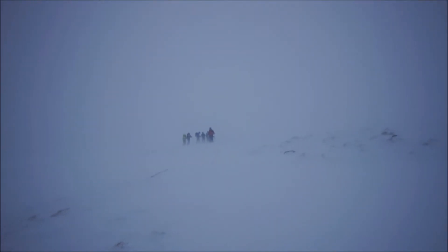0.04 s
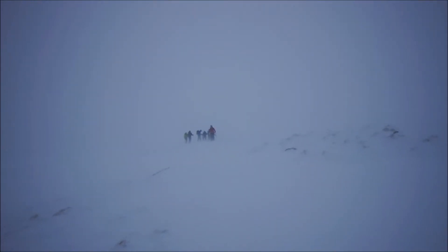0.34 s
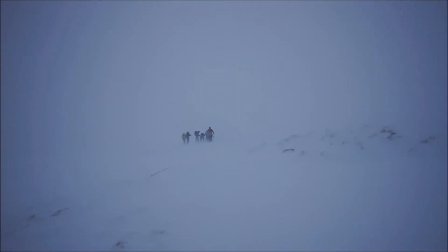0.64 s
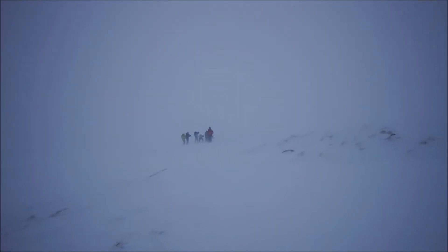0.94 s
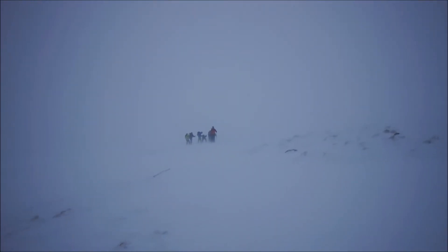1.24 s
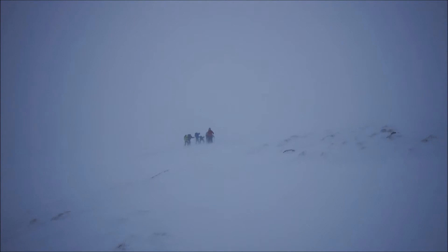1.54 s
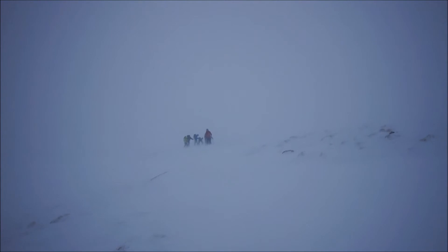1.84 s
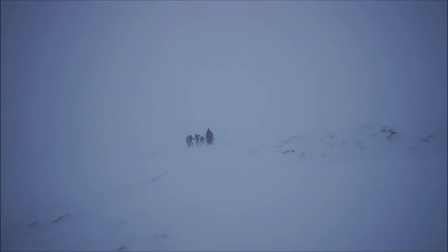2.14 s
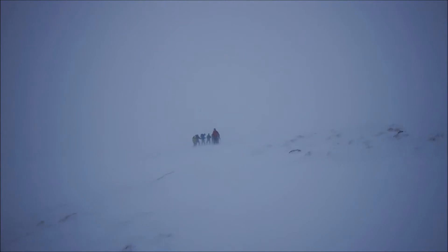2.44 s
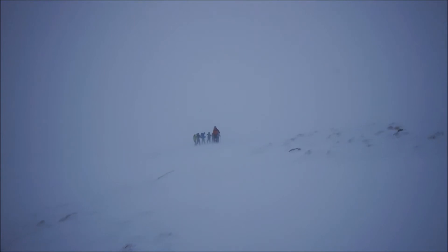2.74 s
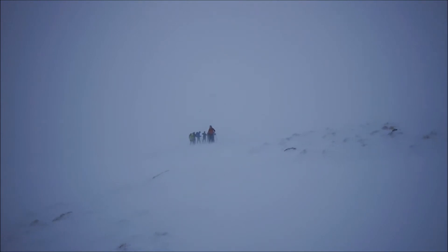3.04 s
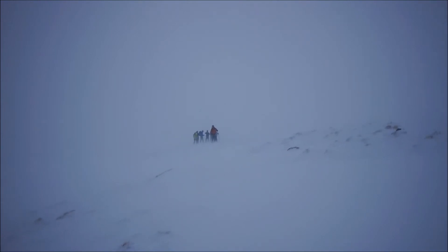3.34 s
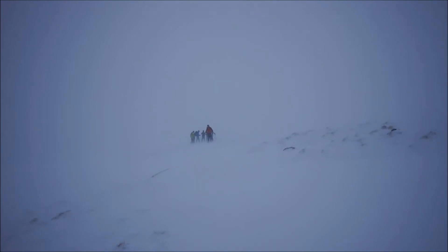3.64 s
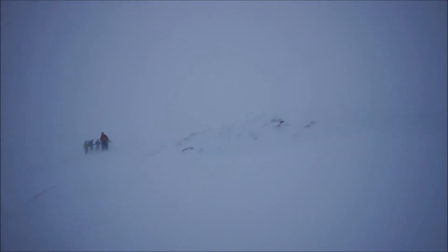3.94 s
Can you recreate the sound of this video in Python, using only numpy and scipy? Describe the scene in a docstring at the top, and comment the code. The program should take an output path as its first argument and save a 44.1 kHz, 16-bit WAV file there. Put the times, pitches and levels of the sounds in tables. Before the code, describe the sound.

Strong gusty wind buffets the microphone with a thumping roar and fluttering hiss.

```python
"""Storm wind blows straight onto a camera's two microphone ports on an open snowy hillside.
Its eddies exert a fluctuating pressure, heard as a thumping low roar that brightens as the wind pushes
harder, gathers now and then into a gliding hoot and breaks off in short lulls. The same flow, tearing
past the housing, adds a fluttering hiss, one bright whoosh and the fine patter of blown snow."""
import sys
import numpy as np
from scipy import signal
from scipy.fft import rfft, irfft
from scipy.io import wavfile
from scipy.ndimage import uniform_filter1d

SR = 44100
rng = np.random.default_rng(int(sys.argv[2]) if len(sys.argv) > 2 else 0)


def log_audio(samples):
    """Write samples as a 16-bit WAV file to the path given in sys.argv[1]."""
    # one column per channel
    frames = np.atleast_2d(samples).T
    # limit to full scale, then quantise
    limited = np.clip(frames, -1, 1)
    pcm = np.round(limited * 32767).astype(np.int16)
    wavfile.write(sys.argv[1], SR, pcm)


N = 176400
TIME_S = np.arange(N) / SR
FREQS = np.maximum(np.arange(N // 2 + 1) * SR / N, 1)
BAND_HZ = 22 * 2 ** np.arange(0, 10.1, .5)

# Push of the wind on the ports: time_s, level_db
WIND_PUSH = [(0, -22), (.12, -18), (.24, -21), (.34, -20), (.42, -20), (.5, -20), (.55, -23.5),
             (.64, -19.5), (.69, -24), (.79, -19.5), (.845, -25.5), (.89, -24.5), (.93, -19.5),
             (1.02, -18.5), (1.06, -20.5), (1.32, -20), (1.38, -21), (1.5, -23), (1.56, -20), (1.62, -22),
             (1.68, -22.5), (1.82, -22), (1.9, -18), (2.02, -21), (2.15, -19), (2.2, -21.5), (2.27, -20.5),
             (2.34, -21.5), (2.55, -19.5), (2.78, -22.5), (2.85, -18.5), (2.96, -21.5), (3.1, -20.5),
             (3.35, -21.5), (3.65, -22), (3.92, -20.5), (4.0, -22.5)]
# Weight of the wind in the bass: time_s, level_db
RUMBLE_WEIGHT = [(0, -17.5), (.35, -17), (.5, -15.5), (.87, -18), (1.0, -16.5), (1.27, -14.5), (1.4, -20),
                 (1.6, -16), (1.9, -17), (2.15, -18), (2.5, -16), (2.8, -18.5), (3.0, -18.5), (3.33, -17.5),
                 (3.55, -19), (3.76, -20.5), (4.0, -17.5)]
# Spectral density of the buffeting: frequency_hz, level_db
BUFFET_SPECTRUM = [(22, 8.5), (42, -1.5), (65, -6), (100, -3), (140, -3.5), (195, 1.43), (270, -1.6),
                   (420, -1.8), (600, -5), (800, -8.5), (1000, -14.5), (1300, -23.5), (1700, -30.5),
                   (2600, -43.5), (5000, -79)]
# Left-right coherence of the buffeting: frequency_hz, coherence_ratio
BUFFET_COHERENCE = [(30, 0.7), (90, 1), (200, 0.97), (400, 0.94), (900, 0.9), (1350, 0.57), (2500, 0.4)]
# Upward shift of the roar with air speed: frequency_hz, gain_db_per_gust_db
GUST_BRIGHTENING = [(100, -0.76), (200, -0.03), (320, 0.6), (620, -0.17), (1100, 1.18), (2200, 0.63)]
# Excess of the roar at the left port: frequency_hz, left_minus_right_db
PORT_BALANCE = [(170, -0.06), (450, 1.7), (750, 2), (1100, 4), (2000, 1)]
# Scaling of that excess as the wind veers: time_s, balance_factor
WIND_VEER = [(0, 1.5), (.8, 2.3), (1.65, 0.29), (2.3, 0.85), (3.6, 1.3), (4, 1.1)]
# Large eddies striking the ports: time_s, rise_db, centre_hz
LARGE_EDDIES = [(0.116, 3.5, 240), (.235, 3.5, 199), (.342, 2.5, 620), (0.644, 2.5, 260), (.956, 4.5, 258),
                (1.01, 2.5, 520), (1.14, 3.5, 340), (1.26, 1, 180), (1.471, 7.5, 223), (1.562, 4, 320),
                (1.604, 3, 190), (1.69, 3.5, 330), (1.738, 6.5, 229), (1.821, 3, 280), (1.9, 0.5, 500),
                (1.96, 5, 258), (2.072, 7, 238), (2.276, 8, 288), (2.616, 4.5, 260), (2.769, 5, 240),
                (3.07, 5.5, 241), (3.24, 5, 300), (3.358, 5.5, 310), (3.938, 1, 300)]
# Gliding hoots in the roar: start_s, length_s, from_hz, to_hz, level_db
HOOT_GLIDES = [(2.495, .06, 450, 259, -23.5), (2.599, .065, 260, 434, -26), (2.742, 0.096, 255, 423, -20.5)]
# The flow breaking away from the ports: centre_s, half_length_s, bass_drop_db, treble_drop_db
FLOW_SEPARATIONS = [(0.852, 0.019, 2, 6.5), (1.171, 0.018, 7, 1), (1.5, 0.0096, -1, 5),
                    (2.02, 0.028, 3.5, -1), (2.342, 0.009, 2, 2), (3.207, 0.02, 2.5, 0)]
# Spread of a lull's treble drop over the spectrum: frequency_hz, drop_factor
TREBLE_DROP_SPREAD = [(300, 0.47), (1000, 1.2), (2500, 0.73), (7000, 1.6)]
# Air speed past the housing, expressed as a level of hiss: time_s, level_db
AIR_SPEED = [(0, -45), (.04, -48), (.11, -41.5), (.16, -47), (.34, -42.5), (.46, -48.5), (.5, -45),
             (.62, -47.5), (.68, -47), (.79, -45), (.84, -47.5), (.88, -48.5), (.94, -44), (1.02, -45.5),
             (1.06, -47.5), (1.15, -42.5), (1.28, -43), (1.37, -45), (1.51, -48), (1.57, -46), (1.63, -41),
             (1.7, -41), (1.74, -43.5), (1.8, -45), (1.92, -44), (2.0, -47.5), (2.14, -42.5), (2.22, -48),
             (2.3, -40), (2.34, -46.5), (2.38, -42), (2.55, -40.5), (2.64, -41.5), (2.76, -40.5),
             (3.0, -45.5), (3.12, -44.5), (3.2, -42.5), (3.4, -41), (3.58, -44), (3.66, -45.5), (3.8, -46),
             (3.93, -41.5), (4.0, -46)]
# Spectral density of the hiss: frequency_hz, level_db
HISS_SPECTRUM = [(500, -6), (1200, -1), (2000, 3.5), (3000, 1), (4400, 0.5), (6000, -4.5), (8400, -8.5),
                 (10000, -14), (12000, -25), (14200, -37), (16000, -46)]
# Left-right coherence of the hiss: frequency_hz, coherence_ratio
HISS_COHERENCE = [(1500, 1), (3000, 0.89), (6000, 0.95), (9000, 1)]
# Envelope of the hardest gust whipping across the housing: time_s, level_db
WHOOSH_ENVELOPE = [(1.6, -60), (1.662, -53), (1.686, -36.5), (1.707, -35.5), (1.722, -54), (1.77, -66)]
# Spectral density of that whoosh: frequency_hz, level_db
WHOOSH_SPECTRUM = [(500, -12), (1400, 9.5), (2200, 3), (4200, -2), (8400, -7.5), (11000, -14.5),
                   (14000, -37), (16000, -55)]
# Narrow dips in the microphone's response: centre_hz, width_hz, depth_ratio
MICROPHONE_NOTCHES = [(3984, 50, .75), (4640, 55, .8), (5545, 70, .72), (9080, 600, .7)]

EDDY_PER_S, FLUTTER_PER_S, HISS_FLUTTER_PER_S = 17.5, 136, 190   # eddies and the fast flutter within them
BUFFET_EDDY_DB, BUFFET_FLUTTER_DB, BUFFET_FLICKER_DB = 0.68, 2, 1.08
HISS_EDDY_DB, HISS_FLUTTER_DB, HISS_FLICKER_DB = 0.8, 1.8, 1.0
BUFFET_GAIN_DB, HISS_GAIN_DB, SNOW_TO_AIR_DB = 3.5, -2, -10.5
RUMBLE_TOP_HZ, ROAR_FROM_HZ = 273, 850   # the rumble gives way to the roar between these
BASS_PUSH_SHARE, BASS_SWIRL_SHARE = 0.26, 0.2
HISS_SWING, HISS_SWING_PER_OCTAVE, HISS_PIVOT_HZ = 0.9, 0.42, 4570   # the top of the hiss swings most


def buffeting(push_db, gust_db, lull_db, eddies, flutter):
    """Turbulent pressure on the ports: a thumping rumble below a roar, both shifting upward in gusts."""
    roar_db, weight_db = push_db - push_db.mean(), in_time(RUMBLE_WEIGHT)
    swirl_db = BUFFET_EDDY_DB * eddies + BUFFET_FLUTTER_DB * flutter
    rumble_db = weight_db - weight_db.mean() + BASS_PUSH_SHARE * roar_db + BASS_SWIRL_SHARE * swirl_db
    lean = in_time(WIND_VEER) * np.array([[.5], [-.5]])
    out = 0
    for hz, band in bands(stereo_noise(BUFFET_SPECTRUM, BUFFET_COHERENCE)):
        roar_share = at_hz([(RUMBLE_TOP_HZ, 0), (ROAR_FROM_HZ, 1)], hz)
        db = (1 - roar_share) * rumble_db + roar_share * (roar_db + swirl_db)
        db += at_hz(GUST_BRIGHTENING, hz) * gust_db
        db += thumps(hz) - lull_drop(lull_db, hz)
        db += BUFFET_FLICKER_DB * drift(EDDY_PER_S)
        out = out + steady_turbulence(band) * from_db(db + lean * at_hz(PORT_BALANCE, hz))
    return from_db(BUFFET_GAIN_DB + push_db.mean()) * out


def steady_turbulence(band, window_s=0.061, compression=0.52):
    """Turbulence between eddies is nearly stationary: compression evens a band's swells at equal rms."""
    power = np.mean(band ** 2, axis=0)
    local_power = np.maximum(uniform_filter1d(power, int(window_s * SR)), 0) / power.mean()
    return np.sqrt(power.mean()) * unit_rms(band * (local_power + 1e-6) ** (-.5 * compression))


def thumps(hz, sigma_s=0.0096, sigma_octaves=0.71):
    """Each large eddy briefly raises the pressure spectrum near its centre: one band's rise in dB."""
    coarse_s = TIME_S[::40]
    time_s, rise_db, centre_hz = np.transpose(LARGE_EDDIES)
    reach = gaussian(np.log2(hz / centre_hz) / sigma_octaves)
    swells = gaussian((coarse_s[:, None] - time_s) / sigma_s)
    return np.interp(TIME_S, coarse_s, swells @ (rise_db * reach))


def pressure_kicks(gain_db=-16, sigma_cycles=0.77):
    """An eddy's impact is a short wave packet, in phase at both ports and stronger for a larger eddy."""
    phases = rng.uniform(0, 2 * np.pi, len(LARGE_EDDIES))
    out = 0
    for (time_s, rise_db, centre_hz), phase in zip(LARGE_EDDIES, phases):
        cycles = (TIME_S - time_s) * centre_hz
        envelope = (from_db(rise_db) - 1) * gaussian(cycles / sigma_cycles)
        out = out + envelope * np.sin(2 * np.pi * cycles + phase)
    return from_db(gain_db) * out


def lulls():
    """Flow separation cuts the pressure abruptly: the bass drop and the treble drop over time, in dB."""
    drop_db = 0
    for centre_s, half_length_s, bass_db, treble_db in FLOW_SEPARATIONS:
        flat_topped = gaussian(((TIME_S - centre_s) / half_length_s) ** 2)
        drop_db = drop_db + np.outer([bass_db, treble_db], flat_topped)
    return drop_db


def lull_drop(lull_db, hz, bass_top_hz=805):
    """Attenuation in a lull depends on frequency: the drop of one band in dB."""
    bass_db, treble_db = lull_db
    bass_share = at_hz([(bass_top_hz / 2, 1), (bass_top_hz, 0)], hz)
    return bass_share * bass_db + at_hz(TREBLE_DROP_SPREAD, hz) * treble_db


def hoots(width_hz=20):
    """Narrow-band noise has a pitch: it swells and glides, probably as a vortex passes the ports."""
    in_phase, quadrature = drift(width_hz), drift(width_hz)
    out = 0
    for start_s, length_s, from_hz, to_hz, level_db in HOOT_GLIDES:
        progress = np.clip((TIME_S - start_s) / length_s, 0, 1)
        phase = 2 * np.pi * np.cumsum(from_hz + (to_hz - from_hz) * progress) / SR
        hoot = np.sin(np.pi * progress) * (in_phase * np.cos(phase) + quadrature * np.sin(phase))
        out = out + from_db(level_db) * unit_rms(hoot) * np.sqrt(length_s * SR / N)
    return out


def rushing_air(gust_db, lull_db, eddies, flutter, flicker_per_s=37):
    """Flow noise of snow-laden air at the housing grows louder and brighter with speed."""
    air = stereo_noise(HISS_SPECTRUM, HISS_COHERENCE) + from_db(SNOW_TO_AIR_DB) * blown_snow(gust_db)
    speed_db = gust_db + HISS_EDDY_DB * eddies + HISS_FLUTTER_DB * flutter
    out = 0
    for hz, band in bands(air):
        swing = HISS_SWING + HISS_SWING_PER_OCTAVE * np.clip(np.log2(hz / HISS_PIVOT_HZ), -.5, 1)
        flicker_db = HISS_FLICKER_DB * drift(flicker_per_s)
        out = out + band * from_db(swing * speed_db - lull_drop(lull_db, hz) + flicker_db)
    return out


def whoosh(flutter):
    """Flow noise surges into a short, bright, tearing rush at the crest of the hardest gust."""
    envelope = from_db(in_time(WHOOSH_ENVELOPE) + HISS_FLUTTER_DB * flutter)
    return envelope * stereo_noise(WHOOSH_SPECTRUM, HISS_COHERENCE)


def blown_snow(gust_db, grains_per_s=1100, spread_db=4, tilt_db_per_octave=5.5):
    """Shot noise: grains strike the housing at random, more often in gusts, brighter than the air."""
    impacts = rng.random(N) < grains_per_s * from_db(gust_db) / SR
    strengths = from_db(spread_db * np.minimum(rng.exponential(1, N), 4)) * rng.choice([-1, 1], N)
    spectrum_db = at_hz(HISS_SPECTRUM, FREQS) + tilt_db_per_octave * np.log2(FREQS / HISS_PIVOT_HZ)
    return unit_rms(irfft(rfft(impacts * strengths) * from_db(spectrum_db), N))


def tick(start_s=1.423, impulse_db=-32, low_cut_hz=12000):
    """A high-passed impulse gives one faint, sharp tick, perhaps a grain of ice on the housing."""
    impulse = np.zeros(N)
    impulse[int(start_s * SR)] = from_db(impulse_db)
    return signal.sosfilt(signal.butter(2, low_cut_hz, "high", fs=SR, output="sos"), impulse + 1e-18)


def stereo_noise(spectrum, coherence):
    """Independent mid and side noises mix to a given spectrum and left-right coherence; rms 1."""
    mid, side = rfft(rng.standard_normal((2, N)))
    alike = at_hz(coherence, FREQS)
    pair = np.sqrt(1 + alike) * mid + np.sqrt(1 - alike) * side * [[1], [-1]]
    return unit_rms(irfft(pair * from_db(at_hz(spectrum, FREQS)), N))


def drift(rate_per_s):
    """Low-passed noise wanders smoothly, with rms 1, changing about rate_per_s times a second."""
    step, settling = 20, 2000
    pole = np.exp(-2 * np.pi * rate_per_s * step / SR)
    noise = rng.standard_normal(N // step + settling + 2)
    slow = signal.lfilter([1], [1, -2 * pole, pole * pole], noise)[settling:]
    return np.interp(np.arange(N) / step, np.arange(len(slow)), unit_rms(slow))


def bands(x):
    """Overlapping half-octave bands sum to the whole signal: yields centre_hz, band."""
    spectrum = rfft(x)
    for hz, weights in zip(BAND_HZ, np.eye(len(BAND_HZ))):
        yield hz, irfft(spectrum * np.interp(np.log(FREQS), np.log(BAND_HZ), weights), N)


def in_time(rows):
    """Linear interpolation of a table at every sample."""
    time_s, value = np.transpose(rows)
    return np.interp(TIME_S, time_s, value)


def at_hz(rows, hz):
    """Interpolation of a table on a log-frequency axis."""
    frequency_hz, value = np.transpose(rows)
    return np.interp(np.log(hz), np.log(frequency_hz), value)


def gaussian(x):
    """Bell curve of height 1 and standard deviation 1."""
    return np.exp(-.5 * x ** 2)


def from_db(db):
    """Amplitude ratio of a level in decibels."""
    return 10 ** (np.asarray(db) / 20)


def unit_rms(x):
    """Normalisation to an rms of 1."""
    return x / np.sqrt(np.mean(x ** 2) + 1e-20)


def scene(flutter_correlation=0.22):
    """Common modulation: roar and hiss share one flow's gusts, eddies, lulls and part of its flutter."""
    push_db, air_db, lull_db = in_time(WIND_PUSH), in_time(AIR_SPEED), lulls()
    gust_db = air_db - air_db.mean()
    eddies, flutter = drift(EDDY_PER_S), drift(FLUTTER_PER_S)
    own_flutter = np.sqrt(1 - flutter_correlation ** 2) * drift(HISS_FLUTTER_PER_S)
    hiss_flutter = flutter_correlation * flutter + own_flutter
    hiss = from_db(HISS_GAIN_DB + air_db.mean()) * rushing_air(gust_db, lull_db, eddies, hiss_flutter)
    roar = buffeting(push_db, gust_db, lull_db, eddies, flutter)
    return roar + hoots() + hiss + whoosh(hiss_flutter) + pressure_kicks() + tick()


def record(dry, wind_filter_hz=137.5, stopband_hz=16200):
    """The microphone acts as a linear filter: a bass cut against wind, narrow dips, a steep top cut."""
    out = signal.sosfilt(signal.butter(3, wind_filter_hz, "high", fs=SR, output="sos"), dry)
    for centre_hz, width_hz, depth in MICROPHONE_NOTCHES:
        b, a = signal.iirpeak(centre_hz, centre_hz / width_hz, fs=SR)
        out = out - depth * signal.lfilter(b, a, out)
    return signal.sosfilt(signal.cheby2(12, 70, stopband_hz, fs=SR, output="sos"), out)


dry = scene()
out = record(dry)
log_audio(out)
```